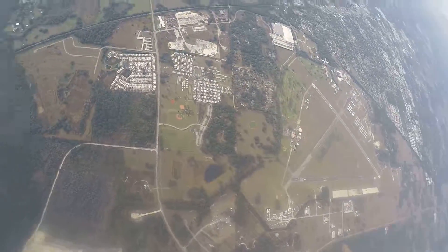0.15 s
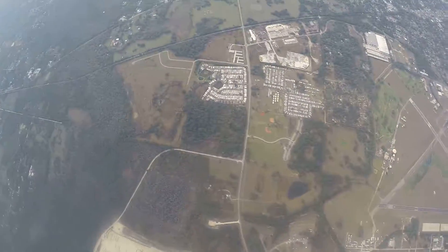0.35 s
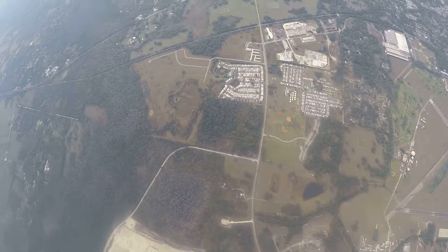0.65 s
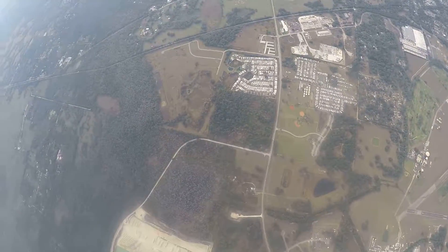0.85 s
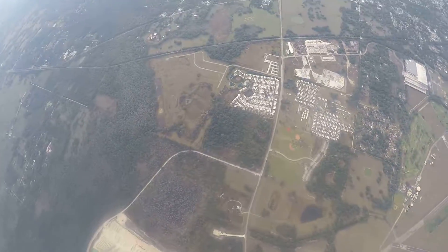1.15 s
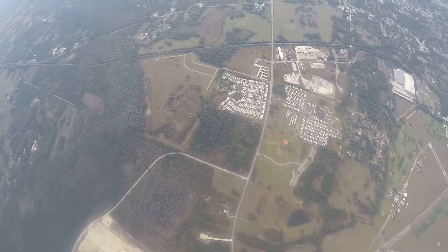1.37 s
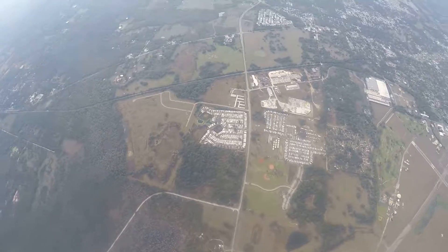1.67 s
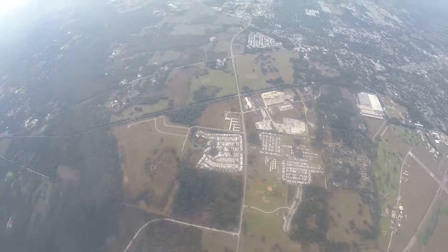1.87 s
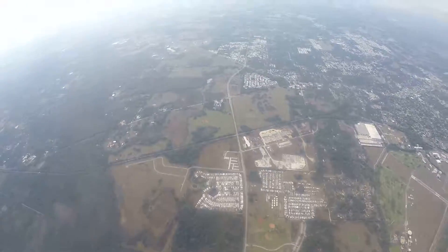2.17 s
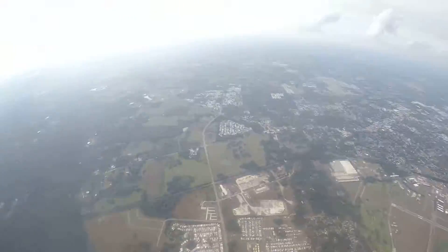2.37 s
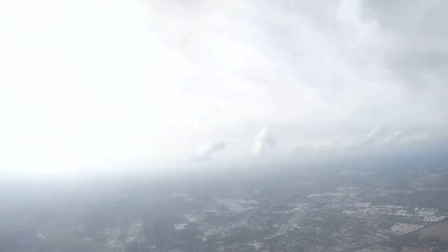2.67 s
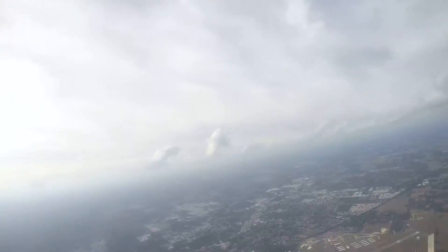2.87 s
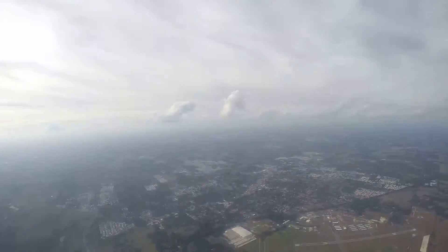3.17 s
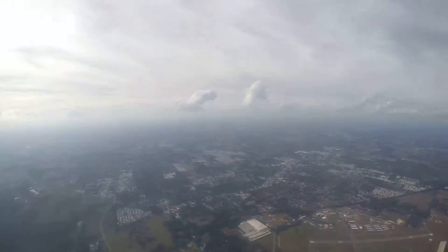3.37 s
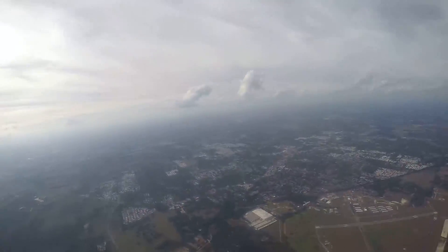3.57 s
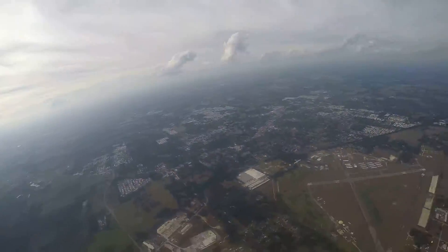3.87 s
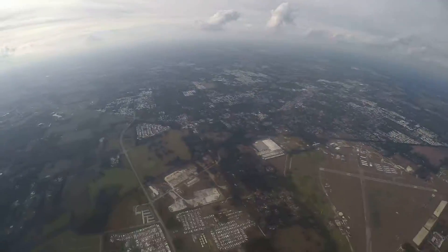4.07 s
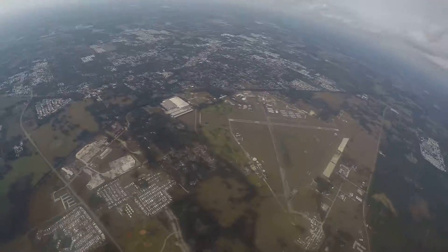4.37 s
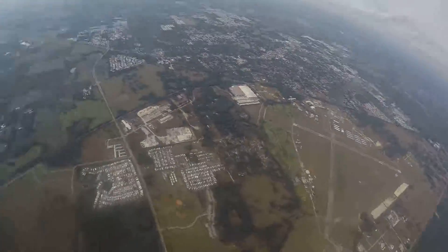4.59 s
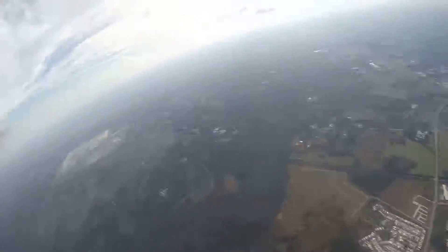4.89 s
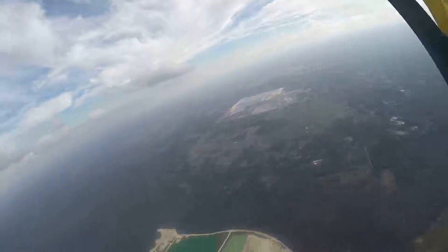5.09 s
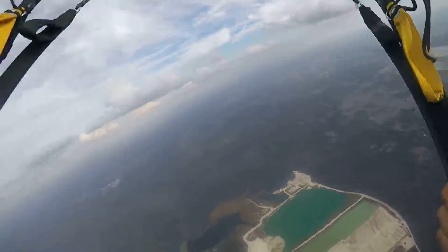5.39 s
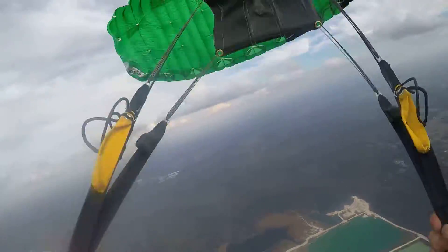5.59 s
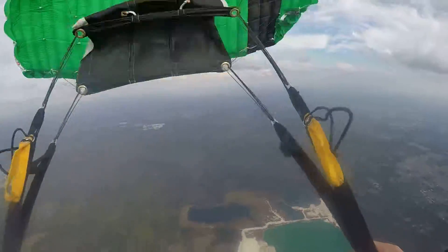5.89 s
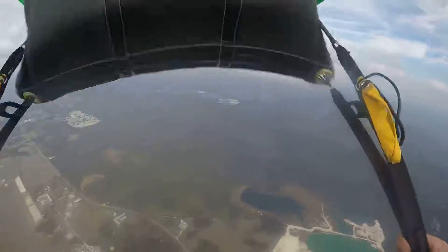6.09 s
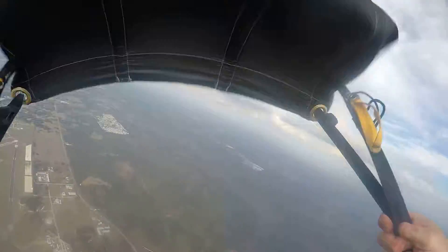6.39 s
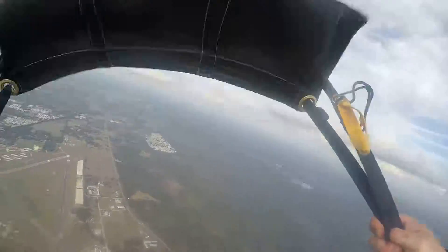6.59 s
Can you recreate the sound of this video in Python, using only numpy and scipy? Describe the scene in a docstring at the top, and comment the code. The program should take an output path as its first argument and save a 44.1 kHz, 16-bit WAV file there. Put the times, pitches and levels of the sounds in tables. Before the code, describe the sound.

Close, mono wind noise on a helmet-mounted microphone during free fall in open sky. From 0 to 2.4 s a strong, bright, fairly steady rush hisses over the plastic housing, with midrange ringing that switches in and out and a faint airy high whistle, above deep irregular buffeting. A rough roar swells around 2.3 s. At about 2.6 s the flow nearly drops out for an instant, then turns duller and ragged, fluttering and sputtering with small gaps and short strap slaps until roughly 3.4 s, thinning and quieting around 4 s. From 4.3 to 4.75 s smoother ringing wind returns. Just after 5 s two heavy low thumps land close together as the canopy opens. Weaker, broken wind dips several times, then buffets strongly near 5.8 s, ringing until 6.35 s. From 6.35 to 6.7 s cloth flaps in quick, crisp slaps over rumbling wind.

```python
"""Free fall and canopy opening

A small camera in a plastic housing on a helmet: big eddies buffet its diaphragm with slow pressure swings.
Noise of air rushing over the housing rings its ports and cavities, flutters and drops out briefly.
Loose straps and cloth slap in short noise bursts once the head lifts; the canopy jolts the helmet
with single pressure swings and flaps overhead. The input stage rounds the loudest peaks."""
import sys
import numpy as np
from scipy import signal
from scipy.fft import rfft, irfft
from scipy.io import wavfile
from scipy.ndimage import uniform_filter1d

SR = 44100
rng = np.random.default_rng(int(sys.argv[2]) if len(sys.argv) > 2 else 0)


def voltage_ratio(decibels):
    """Convert decibels (scalar or array-like) to amplitude ratios, 20 dB per decade."""
    exponent = np.asarray(decibels, float) / 20
    return 10 ** exponent


def master_out(mix):
    """Clip the mix to full scale and print it as 16-bit PCM to the path in sys.argv[1]."""
    frames = np.transpose(np.atleast_2d(mix))
    ceiling = np.clip(frames, -1, 1)
    pcm = np.round(ceiling * 32767).astype(np.int16)
    wavfile.write(sys.argv[1], SR, pcm)


N = 297222
T = np.arange(N) / SR
HZ = np.fft.rfftfreq(N, 1 / SR) + 1e-3  # kept above zero for the logarithm


def level(x):
    """Scale to rms 1."""
    return x / np.sqrt(np.mean(x ** 2))


def noise():
    """White noise for the whole scene."""
    return rng.standard_normal(N)


def shape(points):
    """Gain at every frequency from (f/Hz, level/dB) points."""
    hz, db = np.transpose(points)
    return voltage_ratio(np.interp(np.log(HZ), np.log(hz), db, left=-90, right=-90))


def colour(x, gain):
    """Filter by a gain per frequency."""
    return irfft(rfft(x) * gain, N)


def below(hz):
    """Steep low-pass gain."""
    return 1 / np.sqrt(1 + (HZ / hz) ** 16)


def split(x, tops_hz):
    """Cut a sound into neighbouring bands."""
    edges = [0] + [below(hz) ** 2 for hz in tops_hz] + [1]
    gains = [np.sqrt(np.maximum(high - low, 0)) for low, high in zip(edges, edges[1:])]
    return [colour(x, gain) for gain in gains]


def walk(rate):
    """Random values held 1 / rate s and slewed twice; spread near 1."""
    hold = int(SR / rate)
    steps = np.repeat(rng.standard_normal(N // hold + 1), hold)
    return 0.87 * uniform_filter1d(uniform_filter1d(steps, hold), hold)[:N]


def curves(table):
    """Columns of a table as one value per sample."""
    s, *columns = np.transpose(table)
    return [np.interp(T, s, column) for column in columns]


def spells(table, edge_s):
    """A value that steps up and down again for each spell."""
    return sum(value / 2 * (np.tanh((T - start) / edge_s) - np.tanh((T - end) / edge_s))
               for start, end, value in table)


def rounded(x, top):
    """Clean for small values, bending over towards a ceiling."""
    return x / (1 + (np.abs(x) / top) ** 4) ** (1 / 4)


# how ragged the flow is: [t/s, flutter depth/dB before each layer takes its share]
RAGGEDNESS = [(0, 0.2), (2.4, 2.5), (2.6, 6.5), (4.2, 5.5), (4.4, 0.5), (5.2, 3), (5.9, 6.5), (6.1, 2.5),
              (6.74, 2)]


def flutter():
    """Level in dB: scattered puffs of a few milliseconds over a quick wobble, deeper in ragged flow."""
    depth_db, = curves(RAGGEDNESS)
    puffs_per_s, puff_s = 75, 0.0019
    chance = rng.random((2, N))
    sizes = (chance[0] < puffs_per_s / SR) * (0.67 + chance[1])
    t = np.arange(-400, 400) / SR
    # crowded puffs saturate
    puffs = np.tanh(np.convolve(sizes, np.exp(-(t / puff_s) ** 2), "same"))
    wobble = level(puffs - puffs.mean()) + 0.48 * walk(50)
    return depth_db * wobble


# the flow lets go of the housing: [centre t/s, length/ms, level/dB before each region takes its share]
FLOW_LULLS = [(1.62, 120, -7.5), (2.605, 41, -22), (2.648, 22, -33), (2.784, 58, -12), (2.985, 28, -17),
              (3.09, 22, -7), (3.317, 16, -13), (3.5, 125, -7), (3.68, 124, -7.5), (5.28, 95, -13.5),
              (5.44, 100, -9), (5.62, 107, -12.5), (5.86, 16, -11), (6.495, 19, -9)]


def lulls():
    """Level in dB: flat-bottomed dips while the flow lets go of the housing for an instant."""
    return sum(db * np.exp(-(2000 * (T - s) / ms) ** 4) for s, ms, db in FLOW_LULLS)


# the topmost cavities sing when the flow grazes them: [start t/s, end t/s, level/dB before flicker]
GRAZING_SPELLS = [(0.354, 0.75, -37), (0.75, 1.3, -38.5), (1.75, 2.4, -38), (4.74, 4.865, -43)]
# resonances of the two top cavities: [f/Hz, width/Hz, relative level/dB]
TOP_CAVITIES = [(9380, 1600, 1), (11000, 800, -5)]


def singing():
    """Flow grazing the two top cavities: noise in their resonances, stepped in and out by the spells."""
    gain = sum(voltage_ratio(db) / (1 + (2 * (HZ - hz) / width) ** 4) for hz, width, db in TOP_CAVITIES)
    gate = spells([(start, end, voltage_ratio(db)) for start, end, db in GRAZING_SPELLS], 0.019)
    return level(colour(noise(), gain)) * gate * voltage_ratio(1.5 * walk(29.7))


# spectrum of air over the plastic shell: [f/Hz, relative level/dB per Hz]
SHELL = [(470, -8), (800, -15), (1520, 1), (2170, -4.5), (2610, 0), (3690, 3.5), (4550, -12), (5210, -10.5),
         (5900, -8.5), (6920, -15), (7930, -28.5), (9310, -23.5), (11900, -32), (14500, -33.5),
         (15200, -37)]
# resonances added to the shell: [f/Hz, width/Hz, boost level/dB]
SHELL_CAVITIES = [(1550, 560, -2), (2804, 1230, 9.5), (3630, 820, 5), (5816, 117, 6.5), (9370, 530, 1.5),
                  (11200, 350, 3), (12400, 350, 4)]


def housing():
    """Response of the plastic shell with its cavity resonances."""
    rings_db = sum(db / (1 + (2 * (HZ - hz) / width) ** 2) for hz, width, db in SHELL_CAVITIES)
    return shape(SHELL) * voltage_ratio(rings_db)


# air over the housing: [t/s, hiss level/dB, lift level/dB of the lower regions], shared out by region
AIRFLOW = [(0, -26.5, -5.5), (0.25, -30, -2.5), (0.67, -28.5, 2.5), (1.085, -29.5, -0.5), (1.2, -29.5, -1),
           (2.0, -31.5, 3), (2.4, -32, 3), (2.56, -37.5, 3.5), (3.03, -41, 4), (3.2, -37, 6.5),
           (3.42, -39.5, 2.5), (3.8, -43, 1.5), (4.04, -51.5, -0.5), (4.27, -40.5, 1.5), (4.86, -39, -1),
           (5.0, -36, 5), (5.2, -41, 1.5), (5.65, -40, 1), (5.9, -37, 4.5), (6.3, -38.5, 3),
           (6.4, -41, 5.5), (6.74, -40.5, 6.5)]
# shell, ports, hiss, top cavities, finest hiss:
# [level/dB at the reference flow, share of the hiss change, share of the lift]
HOUSING_REGIONS = [(-24.5, 0.74, 1.1), (-27, 0.78, 0.67), (-30, 1.16, 0.042), (-40, 0.94, 0.5),
                   (-48.5, 1.23, -0.66)]
# upper edges of all regions but the last: [f/Hz]
HOUSING_REGION_TOPS = 2184, 4590, 7450, 12000
# the ports ring loudly while the flow crosses them squarely: [start t/s, end t/s, level/dB]
RINGING_SPELLS = [(0.69, 0.865, 6.5), (0.96, 1.06, 3.5), (1.2, 1.568, 8.5), (1.657, 1.673, 16),
                  (1.69, 1.76, 8.5), (1.794, 1.809, 8.5), (2.33, 2.45, 4.5), (4.3, 4.75, 5),
                  (5.8, 6.35, 5.5)]


def rush(flutter_db):
    """Turbulence excites five housing regions; all feel the same flow and flutter, each flickers alone."""
    reference_db = -30
    hiss_db, lift_db = curves(AIRFLOW)
    # the ports ring at first and fade
    start_db, fade_s = 10, 0.3
    ports_db = spells(RINGING_SPELLS, 0.002) + start_db * np.exp(-(T / fade_s) ** 2)
    spells_db = -0.2 * ports_db, ports_db, 0.11 * ports_db, 0, 0
    flutter_shares = 0.4, 0.75, 0.61, 0.49, 1.07
    regions = split(colour(noise(), housing()), HOUSING_REGION_TOPS)
    total = np.zeros(N)
    for air, settings, spell_db, share in zip(regions, HOUSING_REGIONS, spells_db, flutter_shares):
        db, follow, lift = settings
        flow_db = db + follow * (hiss_db - reference_db) + lift * lift_db
        flicker_db = 1.9 * walk(60)
        total += level(air) * voltage_ratio(flow_db + spell_db + share * flutter_db + flicker_db)
    return total


# spectrum of the broad smack: [f/Hz, relative level/dB per Hz]
SMACK_COLOUR = [(300, 1), (700, 0), (1500, 2), (3600, -3.5), (4700, -11.5), (6000, -12.5), (8000, -26),
                (15500, -35)]


def cloth_bursts(table, treble_db):
    """Short bursts of air: part rings near its own pitch, part is a broad smack of cloth."""
    ring, smack = np.zeros((2, N))
    t = np.arange(int(.06 * SR)) / SR
    rise_s, smack_share = 0.00035, 0.43  # the smack follows only this share of the burst's level in dB
    for s, db, hz in table:
        decay_ms = 5.84 - 0.05 * db  # harder slaps are shorter
        burst = (1 - np.exp(-t / rise_s)) * np.exp(-(1000 * t / decay_ms) ** 0.85)
        sos = signal.butter(2, [hz / 1.186, hz * 1.125], "bandpass", fs=SR, output="sos")
        ring_noise, smack_noise = rng.standard_normal((2, len(t)))
        pitched = level(signal.sosfilt(sos, ring_noise))
        i = int(s * SR)
        ring[i:i + len(t)] += (voltage_ratio(db) * burst * pitched)[:N - i]
        smack[i:i + len(t)] += (voltage_ratio(treble_db + smack_share * db) * burst * smack_noise)[:N - i]
    cloth = shape(SMACK_COLOUR)
    # the smack's level is set by its treble
    treble = np.sqrt(np.mean(cloth ** 2 * (HZ > 4200) * (HZ < 8000)))
    return voltage_ratio(-7.0) * ring + colour(smack, cloth / treble)


# puffs and strap slaps: [t/s, relative level/dB, ring f/Hz]
STRAP_SLAPS = [(2.622, 2, 1640), (2.658, -10, 1640), (2.705, -3, 1470), (2.825, -8.5, 1550),
               (2.879, -9, 1260), (2.911, -6, 1500), (3.024, 2, 1410), (3.165, -3.5, 1160),
               (3.285, -4.5, 2980), (3.328, -5.5, 1410), (3.364, -2.5, 1650), (3.841, -9.5, 1540),
               (3.91, -11, 1650), (4.074, -14, 1450), (5.156, -9, 2900), (5.715, -8, 1660),
               (5.83, -8.5, 1150), (5.95, -9.5, 1210), (6.718, -8, 1500)]


def strap_slaps():
    """Puffs and loose straps: ringing bursts with a faint smack."""
    return cloth_bursts(STRAP_SLAPS, treble_db=-31.5)


# cloth of the opening canopy flapping overhead: [t/s, relative level/dB, ring f/Hz]
CANOPY_FLAPS = [(6.074, -15, 1300), (6.35, -3.5, 2930), (6.426, 0.5, 1560), (6.451, -11, 1490),
                (6.508, 0.5, 1400), (6.584, -3.5, 1390), (6.65, -5.5, 3630)]


def canopy_flaps():
    """Canopy cloth flapping overhead: the same kind of burst with a stronger smack."""
    return cloth_bursts(CANOPY_FLAPS, treble_db=-17.5)


# the canopy catches air and jolts the helmet: [t/s, peak level/dB]
CANOPY_JOLTS = [(5.01, -2.5), (5.048, -5)]


def jolts():
    """Each jolt is one inward swing of the diaphragm with a rebound on either side."""
    width_ms = 3.4
    total = np.zeros(N)
    for s, db in CANOPY_JOLTS:
        x = 1000 * (T - s) / width_ms
        total += voltage_ratio(db) * (x ** 2 - 1) * np.exp(-x ** 2 / 2)
    return total


# pressure of the big eddies on the diaphragm: [t/s, level/dB before gusts]
BIG_EDDIES = [(0, -17.5), (0.5, -15.5), (1.2, -19), (2.2, -17.5), (3.3, -16), (4.1, -19.5), (4.7, -18.5),
              (4.88, -24.5), (5.0, -14.5), (5.16, -17), (5.5, -20.5), (5.8, -14), (6.74, -17)]
# middling eddies: [t/s, level/dB relative to the big ones, before gusts]
MIDDLING_EDDIES = [(0, -7), (1.3, 1), (2.5, -1.5), (4.0, -1), (5.5, -0.5), (6.0, -5.5), (6.74, -8)]
# roar of the small eddies: [t/s, level/dB before gusts]
WAKE_ROAR = [(0.0, -47), (0.4, -28), (1.6, -28), (2.3, -19), (2.5, -36), (3.25, -29.5), (3.55, -38),
             (4.02, -41.5), (4.28, -34.5), (4.71, -28.5), (4.92, -49), (5.02, -24.5), (5.16, -38),
             (5.42, -45), (5.78, -33.5), (6.01, -36), (6.74, -30)]
# spectrum of big and middling eddies: [f/Hz, relative level/dB per Hz]
EDDY_COLOUR = [(8.8, -37), (15, 6), (70, 2.5), (114, -4.5), (144, -5.5), (210, -12.5), (282, -17.5),
               (407, -32), (451, -29), (500, -36), (650, -39.5), (1100, -120)]
# upper edges of all eddy sizes but the last: [f/Hz]
EDDY_TOPS = 47.7, 84.8, 127, 204
# spectrum of the roar: [f/Hz, relative level/dB per Hz]
ROAR_COLOUR = [(120, -40), (220, -0.5), (400, -2.5), (800, -9), (1300, -10)]


def buffeting(flutter_db):
    """Pressure swings of big and middling eddies, and the roar of small ones in the helmet's wake."""
    (big_db,), (middle_db,), (small_db,) = curves(BIG_EDDIES), curves(MIDDLING_EDDIES), curves(WAKE_ROAR)
    gust = walk(12)
    # eddies of each size arrive in lumps of their own
    bands = split(colour(noise(), shape(EDDY_COLOUR)), EDDY_TOPS)
    sizes = [band * voltage_ratio(3.0 * walk(8)) for band in bands]
    big = level(sizes[0] + sizes[1]) * voltage_ratio(big_db + 3.7 * gust)
    middle = level(sum(sizes[2:])) * voltage_ratio(big_db + middle_db + 3.0 * gust + 0.58 * flutter_db)
    roar = level(colour(noise(), shape(ROAR_COLOUR)))
    small = roar * voltage_ratio(small_db + 0.34 * flutter_db + 3.85 * gust + 1.85 * walk(25))
    return big + middle + small


def scene():
    """Singing, rush, cloth, jolts and buffeting at one microphone."""
    flutter_db = flutter()
    air = singing() + rush(flutter_db + lulls())
    cloth = strap_slaps() + canopy_flaps()
    # the diaphragm runs out of travel on the largest slow swings
    swings = rounded(buffeting(flutter_db), 0.62)
    return (air + cloth + jolts() + swings)[None]


def roll_off(x):
    """The treble ends steeply here."""
    return signal.sosfilt(signal.butter(12, 15390, fs=SR, output="sos"), x)


def record(dry):
    """The input stage is clean until close to full scale, then rounds the peaks."""
    mix = rounded(dry, 0.99)
    return roll_off(mix)


dry = scene()
out = record(dry)
master_out(out)
```